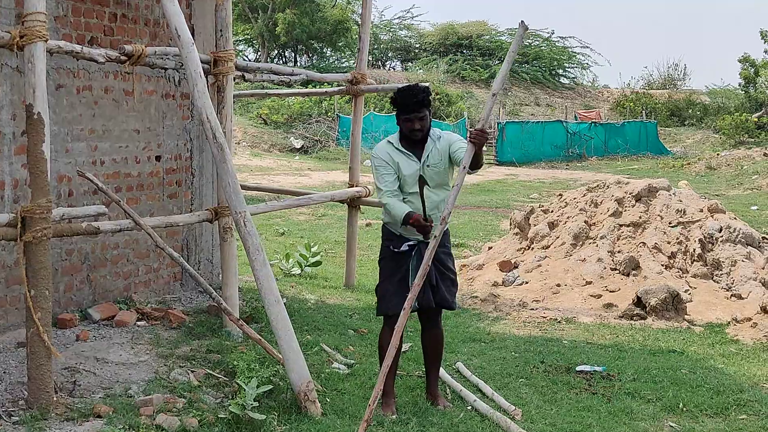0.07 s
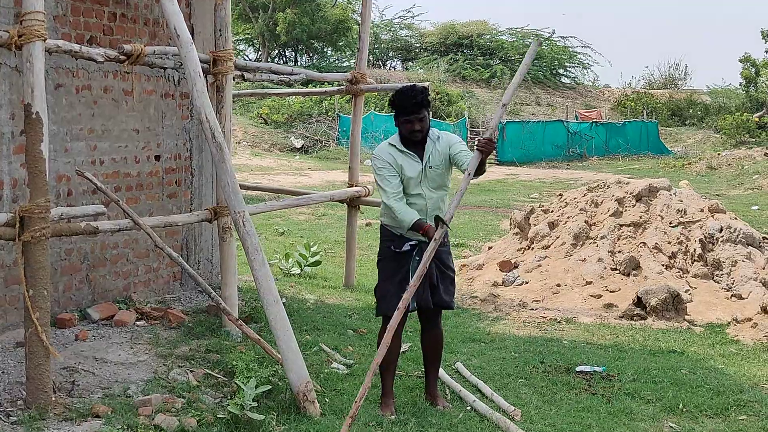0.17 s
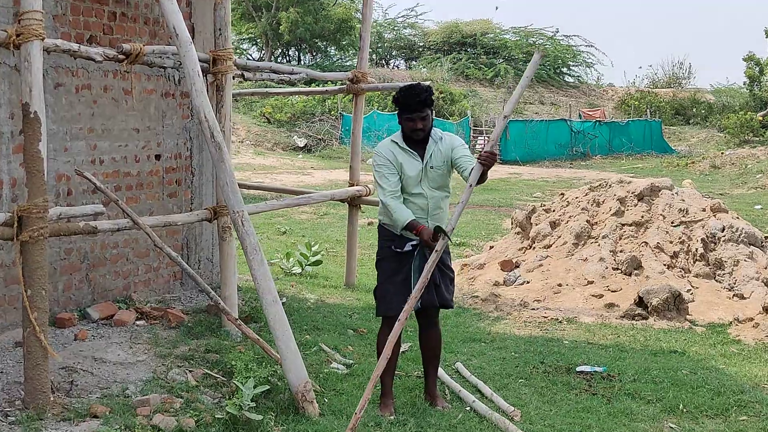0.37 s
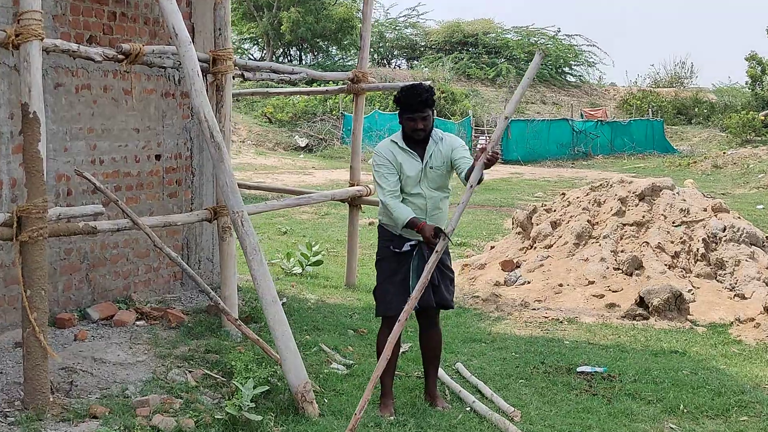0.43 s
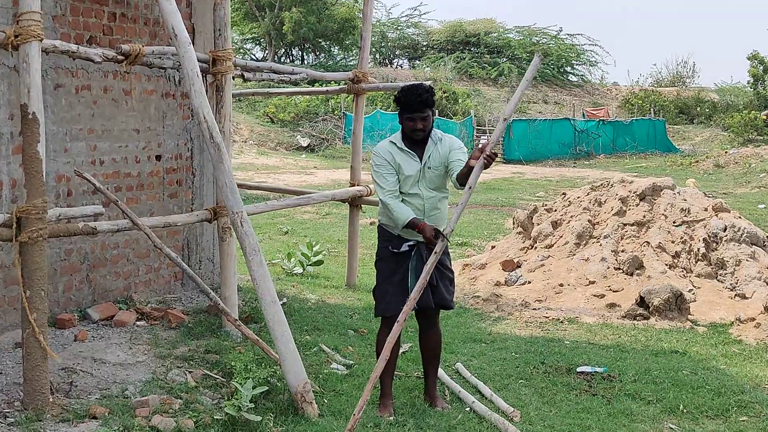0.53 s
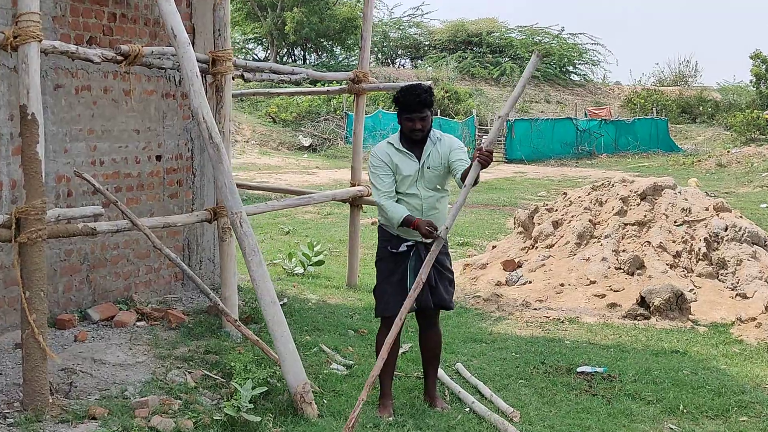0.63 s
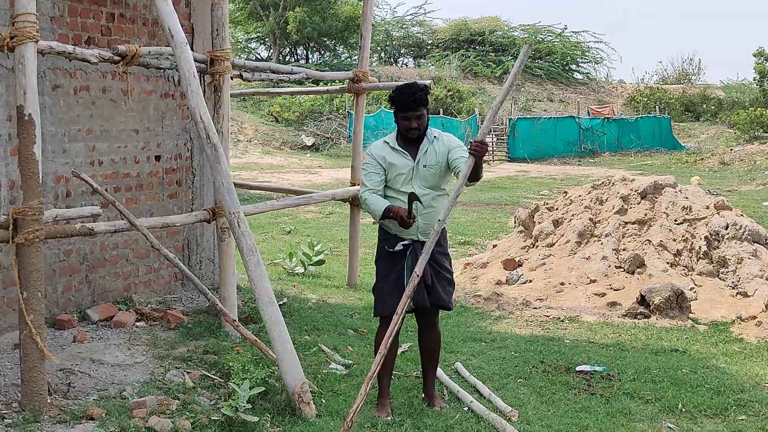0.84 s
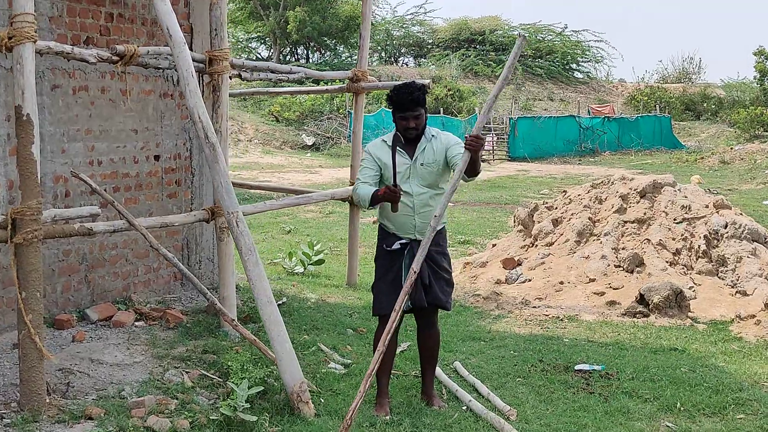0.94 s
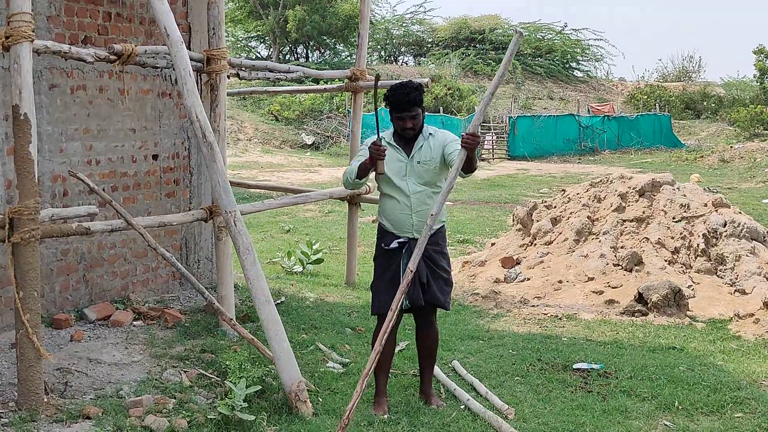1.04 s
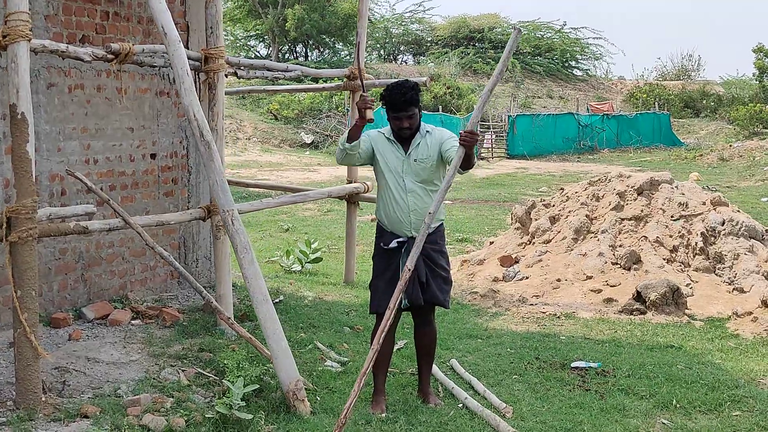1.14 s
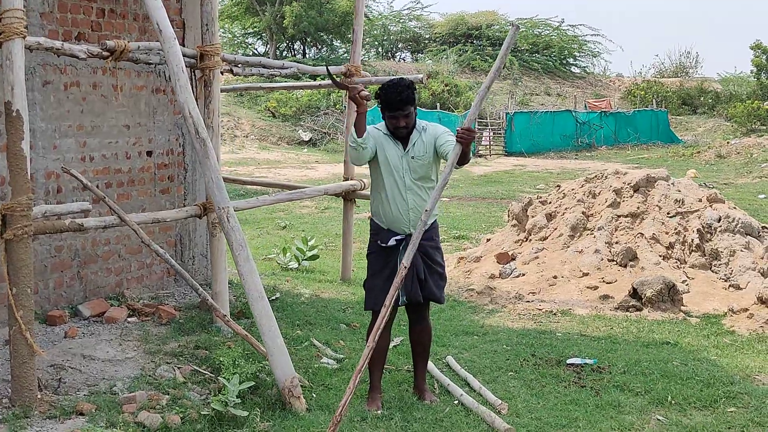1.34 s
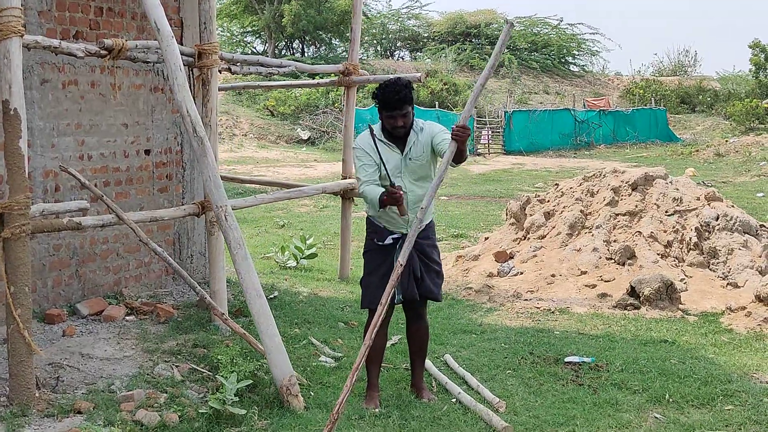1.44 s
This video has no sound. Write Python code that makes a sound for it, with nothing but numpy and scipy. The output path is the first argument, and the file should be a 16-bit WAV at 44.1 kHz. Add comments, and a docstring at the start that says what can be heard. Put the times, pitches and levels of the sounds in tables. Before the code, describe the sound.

A blade bites dry bamboo with a loud splitting crack, then faint rustle and small ticks

```python
"""Outdoors: a blade bites into a dry bamboo pole. Fibres split in a quick run of cracks, dry snaps and a faint rustle
(clicks and noise in third-octave bands, ringing resonances); the tube knocks (struck modes) and chips tick down.
Off to one side something gritty scrunches now and then over a thin distant hiss with a treble that comes and goes
(banded noise). Low rumble, and wind on the microphones, mostly the left (low band-passed noise)."""
import sys
import numpy as np
from scipy import signal
from scipy.fft import rfft, irfft
from scipy.io import wavfile

SR = 44100
rng = np.random.default_rng(int(sys.argv[2]) if len(sys.argv) > 2 else 0)


def rack_gain(trim_db):
    """Turn a fader trim in dB into the linear factor to multiply a signal by."""
    fader = np.asarray(trim_db, float)
    return 10 ** (fader / 20)


def master(y):
    """Save y as 16-bit WAV."""
    cut = np.clip(np.atleast_2d(y).T, -1, 1)
    pcm = np.round(cut * 32767)  # scale
    wavfile.write(sys.argv[1], SR, pcm.astype(np.int16))


N = 66150
T_S = np.arange(N) / SR
BAND_EDGES_HZ = 20 * 2 ** np.arange(0, 9.8, 1 / 3)

# Fibres splitting under the blade. Each row: start in seconds, noise level in dB, ring peak in dB,
# pitch in Hz, left over right in dB, t60 in seconds (of the noise: at 3 kHz).
CRACKS = [(.2037, -10.5, -24, 4140, 12, 0.062), (.2068, -7, -6, 3500, 10, 0.012),
          (.2131, -7, -18, 2400, 11, 0.041), (.2202, -3.5, -19.5, 4890, -4, 0.061),
          (.2300, -6.5, -10.5, 6260, -10, 0.033), (.2384, -17, -8, 3660, -8, 0.017),
          (.2444, -17, -22, 4040, -3, 0.054), (.2535, -25.5, -30.5, 3106, 1.5, 0.12)]
# Colour of splitting. Each row: frequency in Hz, relative density in dB per Hz.
SPLIT_COLOUR = [(290, -33), (500, -18.5), (980, -6.5), (1410, -5), (2010, -6.5), (4760, -8.5), (6100, -7),
                (7710, -5.5), (15100, -11), (16500, -34)]
SPLIT_RISE_S, SPLIT_LAG_S, SPLIT_ALIKE = 0.0005, 0.00042, 0.17
# Loosened fibres rustle on; t60 at 3 kHz.
SETTLE_S, SETTLE_DB, SETTLE_T60_S = 0.288, -37, 0.57

# Single thick fibres breaking. Each row: start in seconds, peak in dB before the high-pass.
SNAPS = [(0.203, -11), (0.207, -6.5), (0.2148, -12), (.2160, -10.5), (0.2202, -10), (0.2196, -7.5),
         (0.2286, -10), (0.2303, -7.5)]
SNAP_T60_S, SNAP_HIGHPASS_HZ = 0.0094, 2550

# Knocks on the tube. Each row: time in seconds, strength in dB.
KNOCKS = [(0.2038, -21.5), (0.21, -19), (.2138, -14.5), (.238, -36.5)]
# Modes of the tube. Each row: frequency in Hz, level in dB relative to the knock, t60 in seconds.
TUBE_MODES = [(108, -2, 0.025), (224, -20.5, 0.17), (298, -23, 0.097), (536, -10.5, 0.064), (733, -2, 0.1),
              (1086, 3, 0.021), (1229, 3.5, .06), (1910, 2.5, 0.06), (2070, -6.5, 0.07)]
TUBE_LAG_S = 0.00017

# Chips and splinters ticking. Each row: start in seconds, noise level in dB, ring peak in dB,
# pitch in Hz, left over right in dB, t60 in seconds (of the noise: at 3 kHz).
TICKS = [(.3225, -32, -32, 6210, -14, 0.023), (.3782, -52, -43, 4030, -33, 0.016),
         (.3810, -49, -39, 4000, -11, 0.015), (.3852, -45, -39, 3650, -22, 0.029),
         (.3938, -47, -27, 4130, -7.5, 0.026), (.7512, -32, -43.5, 6500, 6.5, 0.066),
         (.7612, -48, -37.5, 2050, -9, 0.014), (.7614, -40.5, -30, 6470, -5, 0.036)]
# Colour of ticks and rustle. Each row: frequency in Hz, relative density in dB per Hz.
TICK_COLOUR = [(470, -51), (800, -19), (1400, -8), (2120, -8.5), (6300, -11.5), (8020, -5), (15100, -18.5),
               (16500, -37)]
TICK_RISE_S, TICK_LAG_S, TICK_ALIKE, TICK_RING_WIDTH_HZ = 0.0008, 0.00038, 0.8, 450

# Gritty scrunches to the side. Each row: start in seconds, grit level in dB, ring peak in dB,
# pitch in Hz, left over right in dB, t60 in seconds (of the grit: at 3 kHz).
SCRUNCHES = [(.0565, -37.5, -44.5, 2220, -11.5, 0.12), (.0635, -39, -38.5, 3960, -11, 0.11),
             (.0997, -39.5, -48.5, 5080, -15.5, 0.067), (.168, -61, -66, 4100, 0.5, .08),
             (.5465, -36.5, -35.5, 2123, -6, 0.3), (.548, -56, -33.5, 2550, -15, 0.18),
             (.549, -55, -34.5, 4070, -13, 0.3), (.552, -55, -33, 1775, -8, 0.17),
             (.585, -45, -45, 5850, -20, 0.14), (.608, -46, -45, 2882, -16.5, 0.12),
             (1.3394, -74, -53.5, 2180, -9.5, 0.2)]
# Colour of grit. Each row: frequency in Hz, relative density in dB per Hz.
GRIT_COLOUR = [(350, -40), (500, -10), (1120, -12), (1500, -10.5), (2150, -15), (3120, -4), (4900, -12),
               (6500, -2), (9000, -11.5), (15000, -16), (16800, -40)]
GRIT_RISE_S, GRIT_ALIKE, GRIT_RING_WIDTH_HZ = 0.0012, 0.31, 260
SIDE_LAG_S = 0.00041

# Hiss over time. Each row: time in seconds, mean level in dB.
HISS_LEVEL = [(0, -53.5), (.146, -55.5), (.3, -52), (.85, -57.5), (1.0, -57.5), (1.1, -55.5), (1.24, -57.5),
              (1.5, -60.5)]
# Colour of hiss. Each row: frequency in Hz, relative density in dB per Hz.
HISS_COLOUR = [(200, -42), (280, -6), (600, -7), (1010, -9.5), (1600, -6), (2200, -6.5), (3830, -3),
               (6470, -15), (9000, -34.5), (10500, -59.5)]
HISS_SWELL_DB, HISS_ALIKE = 0.6, 0.21
HISS_PAN_DB = -11   # left over right
# Treble over time. Each row: time in seconds, mean level in dB.
TREBLE_LEVEL = [(0, -54.5), (.05, -63), (.15, -62.5), (.3, -52), (.5, -67), (1.5, -73.5)]
# Colour of treble. Each row: frequency in Hz, relative density in dB per Hz.
TREBLE_COLOUR = [(4410, -24), (7500, 0.5), (11000, -11), (15500, -5), (16500, -55)]

# Colour of rumble. Each row: frequency in Hz, relative density in dB per Hz.
RUMBLE_COLOUR = [(12, -30), (20, -5.5), (91, -1.5), (195, -5), (233, -3.5), (369, -11.5), (700, -11.5),
                 (910, -39.5)]
RUMBLE_DB, RUMBLE_FLICKER_DB = -55.5, 1.5
# Wind over time. Each row: time in seconds, level in dB before the offset of each microphone.
GUST = [(0, -61), (.11, -40.5), (.16, -54.5), (.28, -48.5), (.38, -56), (.46, -48), (.6, -57.5),
        (1.0, -63.5), (1.42, -64.5), (1.5, -35)]
WIND_TOP_HZ, WIND_LEFT_DB, WIND_RIGHT_DB = 51, 0, -14.5

# Colour of the whole mix: raised from 2 to 7 kHz, cut above 16 kHz. Each row: frequency in Hz, gain in dB.
MIX_COLOUR = [(20, 0), (1850, -6), (2030, 0), (6800, 0), (7250, -10), (15700, -10), (16100, -35),
              (22000, -35)]
PEAK_LIMIT = 0.93


def rms_one(x):
    """Scale to rms 1."""
    return x / np.sqrt(np.mean(x ** 2) + 1e-20)


def at_hz(points, hz):
    """Read a dB curve on a log frequency axis; -120 dB outside it."""
    p = np.array(points)
    return np.interp(np.log(hz), np.log(p[:, 0]), p[:, 1], -120, -120)


def late(x, lag_s):
    """Delay by any time, whole samples or not: a linear phase slope."""
    hz = np.arange(N // 2 + 1) * SR / N
    return irfft(rfft(x) * np.exp(-2j * np.pi * lag_s * hz), N)


def sides(pan_db):
    """Left and right dB offsets, pan_db apart."""
    return np.array([[pan_db / 2], [-pan_db / 2]])


def filtered(x, order, hz, kind):
    """Butterworth filter."""
    return signal.sosfilt(signal.butter(order, hz, kind, fs=SR, output="sos"), x)


def drift(rate_hz):
    """Slow random wander of rms 1: two-pole low-passed noise, computed every 40 samples."""
    r = np.exp(-80 * np.pi * rate_hz / SR)
    slow = signal.lfilter([1], [1, -2 * r, r * r], rng.standard_normal(N // 40 + 2002))[2000:]
    return np.interp(np.arange(N) / 40, np.arange(len(slow)), rms_one(slow))


def grains(per_s, spread_db):
    """Random clicks of uneven size: two draws of (shared, left, right)."""
    shape = (2, 3, N)
    size = rack_gain(spread_db * np.minimum(rng.exponential(1, shape), 4))
    size = size * rng.choice([-1, 1], shape)
    return rms_one(size * (rng.random(shape) < per_s / SR) + 1e-9)


def bands(source, colour, gain, alike, lag_s):
    """Third-octave bank: gain(hz) is a left/right envelope, alike the shared power; rms 1 at unit gain."""
    out, power = np.zeros((3, 2, N)), 0
    for k, (low, high) in enumerate(zip(BAND_EDGES_HZ, BAND_EDGES_HZ[1:])):
        hz = np.sqrt(low * high)
        if colour[0][0] < hz < colour[-1][0]:
            g = rack_gain(at_hz(colour, hz))
            power += g * g * (high - low) * 2 / SR
            # neighbouring bands use different draws
            band = filtered(source[k % 2], 2, [low, high], "band")
            out += g * gain(hz) * band[:, None]
    shared = np.array([out[0, 0], late(out[0, 1], lag_s)])
    separate = np.array([out[1, 0], out[2, 1]])
    return (np.sqrt(alike) * shared + np.sqrt(1 - alike) * separate) / np.sqrt(power)


def bursts(rows, rise_s, tilt):
    """Envelope per band: fast rise, exponential decay, shorter in the treble; bursts add in power."""
    def gain(hz):
        power, t = np.zeros((2, N + SR)), T_S[:SR // 2]
        for start_s, db, _, _, pan_db, t60_s in rows:
            env = (1 - np.exp(-t / rise_s)) * rack_gain(-60 * t / (t60_s * (hz / 3000) ** -tilt))
            i = int(start_s * SR)
            power[:, i:i + len(t)] += (env * rack_gain(db + sides(pan_db))) ** 2
        return np.sqrt(power[:, :N])
    return gain


def resonance(x, hz, width_hz):
    """Two-pole resonance, gain 1 on top."""
    r = np.exp(-np.pi * width_hz / SR)
    a = [1, -2 * r * np.cos(2 * np.pi * hz / SR), r * r]
    return signal.lfilter([(1 - r * r) / 2, 0, (r * r - 1) / 2], a, x)


def pings(rows, width_hz, rise_s, lag_s, struck=0):
    """Each piece rings at its own pitch, shaken by decaying noise after a first stroke of size struck."""
    out, t = np.zeros((2, N + SR)), T_S[:SR // 4]
    for start_s, _, db, hz, pan_db, t60_s in rows:
        shake = rng.standard_normal(len(t)) * (1 - np.exp(-t / rise_s)) * rack_gain(-60 * t / t60_s)
        shake[0] = struck
        tone = resonance(resonance(shake, hz, width_hz), hz, 2 * width_hz)
        i = int(start_s * SR)
        out[:, i:i + len(t)] += tone / np.abs(tone).max() * rack_gain(db + sides(pan_db))
    return np.array([out[0, :N], late(out[1, :N], lag_s)])


def splitting():
    """Fibres give way in dense clicks that ring, then rustle faintly."""
    fibres = grains(per_s=6000, spread_db=4)
    crack_gain = bursts(CRACKS, SPLIT_RISE_S, tilt=0.2)
    cracks = bands(fibres, SPLIT_COLOUR, crack_gain, SPLIT_ALIKE, SPLIT_LAG_S)
    rings = pings(CRACKS, width_hz=570, rise_s=SPLIT_RISE_S, lag_s=SPLIT_LAG_S)
    loose = grains(per_s=10000, spread_db=1.5)
    settle = [(SETTLE_S, SETTLE_DB, 0, 0, -3, SETTLE_T60_S)]   # ring and pitch unused
    rustle_gain = bursts(settle, rise_s=0.031, tilt=0.52)
    rustle = bands(loose, TICK_COLOUR, rustle_gain, alike=0.381, lag_s=SPLIT_LAG_S)
    return cracks + rings + rustle


def snaps():
    """Each thick fibre breaks with a short decaying wisp of noise, thin in the bass."""
    out, t = np.zeros(N), T_S[:SR // 100]
    for start_s, db in SNAPS:
        wisp = rng.standard_normal(len(t)) * rack_gain(-60 * t / SNAP_T60_S)
        i = int(start_s * SR)
        out[i:i + len(t)] += rack_gain(db) * wisp / np.abs(wisp).max()
    out = filtered(out, 1, SNAP_HIGHPASS_HZ, "high")
    return np.array([out, late(out, SPLIT_LAG_S)])


def tube():
    """Each knock strikes every mode, a decaying sine, with a strength of its own."""
    out = np.zeros(N)
    for hz, level_db, t60_s in TUBE_MODES:
        clicks = np.full(N, 1e-18)
        for knock_s, db in KNOCKS:
            clicks[int(knock_s * SR)] = rack_gain(db + level_db + rng.normal(0, 0.83))
        r, w = rack_gain(-60 / (t60_s * SR)), 2 * np.pi * hz / SR
        out += signal.lfilter([0, np.sin(w)], [1, -2 * r * np.cos(w), r * r], clicks)
    out = filtered(out, 2, 70, "high")
    return np.array([out, late(out, TUBE_LAG_S)])


def chips():
    """Light pieces tick: short bursts of clicks, each struck at a pitch of its own."""
    clicks = grains(per_s=5000, spread_db=4)
    tick_gain = bursts(TICKS, TICK_RISE_S, tilt=0.092)
    noise = bands(clicks, TICK_COLOUR, tick_gain, TICK_ALIKE, TICK_LAG_S)
    return noise + pings(TICKS, TICK_RING_WIDTH_HZ, TICK_RISE_S, TICK_LAG_S, struck=5.2)


def scrunches():
    """Gritty bursts of uneven clicks, longer than the ticks, with shaken resonances."""
    grit = grains(per_s=4900, spread_db=4.5)
    grit_gain = bursts(SCRUNCHES, GRIT_RISE_S, tilt=0.42)
    noise = bands(grit, GRIT_COLOUR, grit_gain, GRIT_ALIKE, SIDE_LAG_S)
    return noise + pings(SCRUNCHES, GRIT_RING_WIDTH_HZ, GRIT_RISE_S, SIDE_LAG_S)


def hiss(white):
    """Patchy noise: all bands swell together a little and each wanders on its own."""
    level_db = np.interp(T_S, *np.transpose(HISS_LEVEL)) + sides(HISS_PAN_DB)
    level_db = level_db + HISS_SWELL_DB * drift(25)
    return bands(white, HISS_COLOUR, lambda hz: rack_gain(level_db + 2.32 * drift(30)), HISS_ALIKE, SIDE_LAG_S)


def treble(white):
    """High noise that comes and goes, each band wandering on its own."""
    level_db = np.interp(T_S, *np.transpose(TREBLE_LEVEL)) + sides(HISS_PAN_DB)
    return bands(white, TREBLE_COLOUR, lambda hz: rack_gain(level_db + 1.6 * drift(15)), 0.384, SIDE_LAG_S)


def rumble():
    """Low noise, each band flickering slowly."""
    white = rng.standard_normal((2, 3, N))
    return bands(white, RUMBLE_COLOUR, lambda hz: rack_gain(RUMBLE_DB + RUMBLE_FLICKER_DB * drift(8.2)),
                 alike=0.74, lag_s=0.000067)


def wind():
    """Gusts press on each microphone separately: independent low-frequency noise."""
    lumps = filtered(rng.standard_normal((2, N)), 2, [18, WIND_TOP_HZ], "band")
    gust_db = np.interp(T_S, *np.transpose(GUST))
    return rms_one(lumps) * rack_gain(gust_db + np.array([[WIND_LEFT_DB], [WIND_RIGHT_DB]]))


def scene():
    """Sum of all sources."""
    white = rng.standard_normal((2, 3, N))   # common to hiss and treble
    pole = splitting() + snaps() + tube() + chips()
    return pole + scrunches() + hiss(white) + treble(white) + rumble() + wind()


def top_cut(x):
    """Nothing passes above the cut-off."""
    return signal.sosfilt(signal.butter(12, 16800, fs=SR, output="sos"), x)


def record(dry):
    """Colour of the whole mix, raised from 2 to 7 kHz and cut above 16 kHz, then rounded peaks."""
    hz = np.clip(np.arange(N // 2 + 1) * SR / N, 21, 21000)
    heard = irfft(rfft(dry) * rack_gain(at_hz(MIX_COLOUR, hz)), N)
    heard = heard / (1 + (heard / PEAK_LIMIT) ** 4) ** (1 / 4)
    return top_cut(heard)


dry = scene()
out = record(dry)
master(out)
```